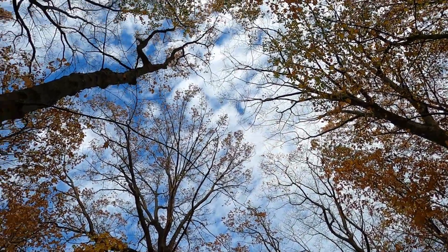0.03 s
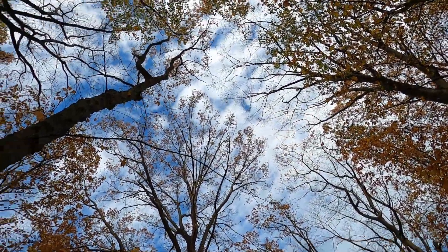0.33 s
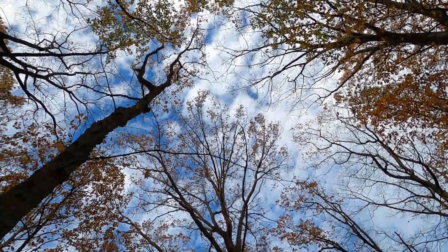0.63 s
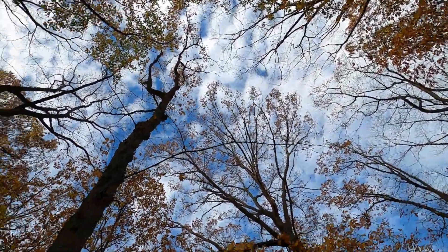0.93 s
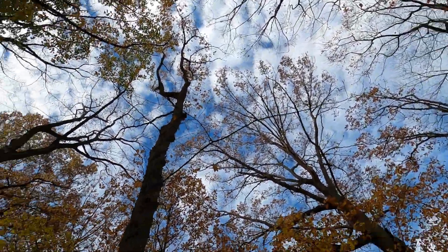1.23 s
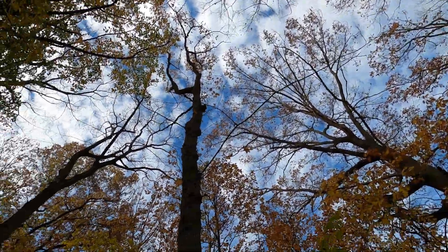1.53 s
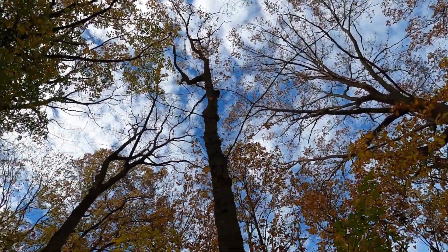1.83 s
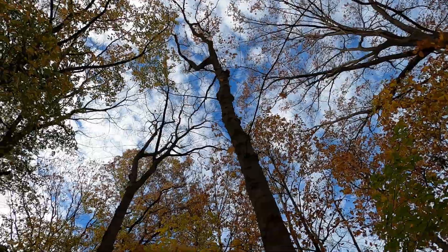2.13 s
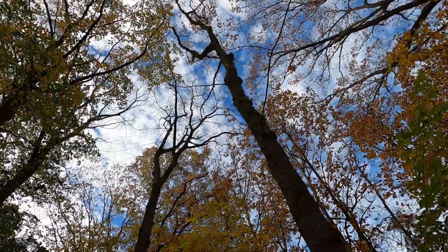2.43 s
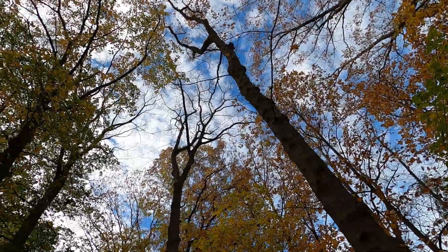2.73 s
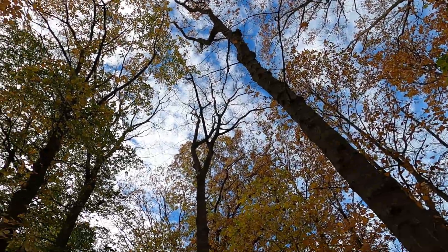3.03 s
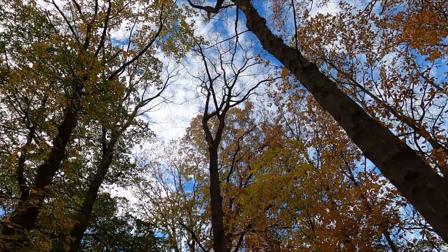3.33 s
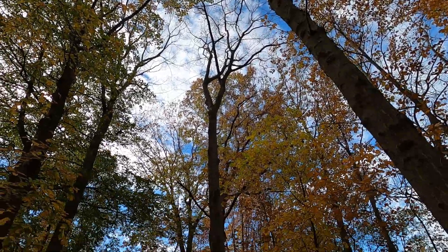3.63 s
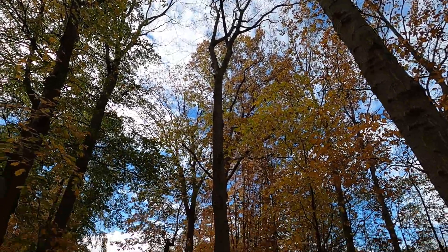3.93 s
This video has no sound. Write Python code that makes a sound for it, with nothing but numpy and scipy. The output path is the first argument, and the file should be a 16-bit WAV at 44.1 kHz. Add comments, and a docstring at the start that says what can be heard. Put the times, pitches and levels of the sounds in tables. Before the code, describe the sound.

Wind blows through high forest foliage as an even, airy rush above a low, distant rumble. It lifts a little in light gusts, then softens, while a few faint dry leaf rustles and ticks come from close by.

```python
"""Wind rushes through the crowns of an autumn wood, swells a little and eases off.
Countless far leaves merge into that rush; gusts add a whoosh, nearer foliage an airy hiss.
A low rumble, like far traffic, lies under it. Close by, dry leaves brush together in faint rustles,
with a few sharper ticks. The bass is nearly mono; the treble differs between the microphone's ports."""
import sys
import numpy as np
from scipy import signal
from scipy.fft import rfft, irfft, next_fast_len
from scipy.io import wavfile
from scipy.ndimage import uniform_filter1d, map_coordinates

SR = 44100
rng = np.random.default_rng(int(sys.argv[2]) if len(sys.argv) > 2 else 0)


def wav_out(sig):
    """Save sig, one row per channel (or a flat mono array), as 16-bit PCM at SR to the path in sys.argv[1]."""
    wavfile.write(sys.argv[1], SR, np.round(np.clip(np.atleast_2d(sig).T, -1, 1) * 32767).astype(np.int16))


N = 176400


def amp(db):
    """Decibels to gain."""
    return 10 ** (np.asarray(db) / 20)


def unit(x):
    """Scale to rms 1."""
    return x / np.sqrt(np.mean(x ** 2) + 1e-20)


def along(points, hz):
    """Read (Hz, value) points on a log frequency axis."""
    freqs, values = np.transpose(points)
    return np.interp(np.log(hz + 1), np.log(freqs + 1), values)


def curve(rows):
    """Join (seconds, value) points into an envelope, one value per sample."""
    return np.interp(np.arange(N) / SR, *np.transpose(rows))


def wobble(rate):
    """A smooth random curve with `rate` knots a second."""
    return map_coordinates(rng.standard_normal(400), [np.arange(N) * rate / SR], mode="wrap")


def filtered(x, response):
    """Equalise x with a gain given as a function of Hz."""
    size = next_fast_len(N + SR // 2)
    return irfft(rfft(x, size) * response(np.fft.rfftfreq(size, 1 / SR)), size)[..., :N]


def patchy_noise(depth_db):
    """Two white noises whose level flickers in patches of time and frequency."""
    spectra = signal.stft(rng.standard_normal((2, N)), nperseg=512)[2]
    patches = uniform_filter1d(rng.standard_normal(spectra.shape[1:]), size=7, axis=0)
    patches = uniform_filter1d(patches, size=30, axis=1, mode="wrap")
    return signal.istft(spectra * amp(depth_db * unit(patches)), nperseg=512)[1][:, :N]


# Stereo width. Each row: frequency in Hz, left-right likeness from 0 (wide) to 1 (mono).
PORT_LIKENESS = [(30, .98), (70, .994), (150, .994), (330, .975), (700, .89), (1050, .84), (1400, .87),
                 (2500, .82), (4000, .71), (5000, .45), (6300, .13), (12000, .05)]
# Stereo balance. Each row: frequency in Hz, left over right in dB.
PORT_BALANCE = [(100, 0.63), (1300, -0.12), (2400, 0.89), (4200, 2.2), (6500, -0.11), (12000, -1)]
LEFT_RIGHT = np.array([[.5], [-.5]])  # half of a difference goes to each side
RIGHT_LEAD_S = 43e-6


def at_ports(pair, colour):
    """Colour two noises as a wide, far source heard by two close microphone ports; rms 1."""
    def mid_side(hz):
        width = np.arccos(np.clip(along(PORT_LIKENESS, hz), -1, 1)) / 2
        return amp(along(colour, hz)) * [np.cos(width), np.sin(width)]

    def placement(hz):
        delay = np.exp(-2j * np.pi * hz * LEFT_RIGHT * RIGHT_LEAD_S)
        return amp(LEFT_RIGHT * along(PORT_BALANCE, hz)) * delay

    mid, side = filtered(pair, mid_side)
    return unit(filtered(np.array([mid + side, mid - side]), placement))


# Fader rides for the broad rush, the gusts' whoosh and the hiss. Each row: time in seconds, level in dB.
RUSH_LEVEL = [(0, -33.5), (.45, -33), (.9, -33), (1.35, -32.5), (1.7, -33), (2.05, -33), (2.45, -34),
              (2.75, -34), (3.1, -35), (3.5, -35), (4, -36.2)]
GUST_LEVEL = [(0, -59), (.4, -53), (.58, -38.5), (.95, -51), (1.15, -35), (1.3, -55), (1.5, -39),
              (1.66, -34.5), (1.95, -41.5), (2.5, -57), (2.7, -39), (2.95, -54), (4, -48)]
FOLIAGE_LEVEL = [(0, -35), (.4, -38), (.8, -40), (1.2, -45.5), (1.75, -40), (2.1, -43.5), (2.7, -44.5),
                 (4, -52)]
# Tone of the same three layers. Each row: frequency in Hz, relative level in dB.
RUSH_COLOUR = [(20, -58), (150, -18), (330, -13.5), (480, -12.5), (780, -9), (930, -4.5), (1040, -4),
               (1180, 1.3), (1450, -0.5), (2050, -3.5), (3000, -10), (4400, -18.5), (6300, -30),
               (9000, -39.5), (12000, -53.5), (15500, -78)]
GUST_COLOUR = [(700, -64), (1050, -10), (1250, -3), (1450, -5), (1750, -10.5), (2600, -26), (6000, -70)]
FOLIAGE_COLOUR = [(300, -90), (700, -20), (1300, 0), (1900, 2), (3000, -11.5), (5000, -16.5), (8000, -30),
                  (11000, -45), (15000, -57)]
# A slight drift to the left as the microphone turns. Each row: time in seconds, left over right in dB.
CROWN_PAN = [(0, 0.5), (.7, 0.2), (1.3, -0.1), (2.2, 0.3), (3, 0.6), (4, 1)]


def wind_in_crowns():
    """Countless far leaves merge into a rush; gusts add a whoosh, nearer foliage a brighter hiss."""
    rush = amp(curve(RUSH_LEVEL)) * at_ports(patchy_noise(depth_db=0.33), RUSH_COLOUR)
    whoosh = amp(curve(GUST_LEVEL)) * at_ports(rng.standard_normal((2, N)), GUST_COLOUR)
    hiss = amp(curve(FOLIAGE_LEVEL)) * at_ports(patchy_noise(depth_db=1.2), FOLIAGE_COLOUR)
    return (rush + whoosh + hiss) * amp(LEFT_RIGHT * curve(CROWN_PAN))


# Fader rides for the rumble's sub, body and upper drone. Each row: time in seconds, level in dB.
SUB_LEVEL = [(0, -45), (.3, -41), (.55, -55), (1.4, -51), (1.95, -46), (2.2, -41), (2.5, -41.5), (2.9, -43),
             (3.2, -45), (3.6, -47)]
BODY_LEVEL = [(0, -37.5), (.65, -41), (.95, -37), (1.3, -37.5), (1.75, -33), (2.4, -36), (3, -37),
              (3.5, -41), (4, -40)]
UPPER_LEVEL = [(0, -47), (.4, -41), (.8, -44), (1.3, -43), (1.8, -52.5), (2.4, -49.5), (3.3, -50), (4, -51)]
# Tone of the same three layers. Each row: frequency in Hz, relative level in dB.
SUB_COLOUR = [(10, -30), (25, -15), (42, 5), (62, 6.5), (85, -20), (140, -10), (600, -120)]
BODY_COLOUR = [(12, -26), (25, -15), (42, -12.5), (62, -2), (84, 0.5), (97, -0.5), (108, 0), (123, -3.5),
               (136, -15.5), (200, -18), (320, -33.5), (800, -69), (3000, -120)]
UPPER_COLOUR = [(30, -70), (70, -44), (110, 4), (150, 4), (200, -5.5), (250, -4), (320, -13.5), (600, -26),
                (2000, -120)]


def far_rumble():
    """Three bands of low, nearly mono noise: the rumble swells and deepens as its upper drone fades."""
    bands = [(SUB_LEVEL, SUB_COLOUR), (BODY_LEVEL, BODY_COLOUR), (UPPER_LEVEL, UPPER_COLOUR)]
    return sum(amp(curve(level)) * at_ports(rng.standard_normal((2, N)), colour)
               for level, colour in bands)


# The crisp tone of a dry leaf, for rustles and ticks. Each row: frequency in Hz, relative level in dB.
LEAF_COLOUR = [(1000, -22), (3000, -5), (5500, 7.5), (8000, -1.5), (11000, -8), (15500, -19)]
# Brief rustles. Each row: peak time in seconds, rise and fall time constant in seconds, level in dB.
RUSTLE_SWELLS = [(.81, .03, -65), (1.15, .3, -70), (1.85, .03, -64), (2.25, .08, -61), (2.735, 0.079, -60),
                 (3.15, 0.048, -56.5), (3.24, 0.07, -66), (3.624, 0.015, -57), (3.7, 0.07, -64)]
CONTACTS_PER_S, CONTACT_SPREAD_DB, STIR_DB = 1800, 1, -76
CLUMPS_PER_S, CLUMP_DB = 24, 1.5


def rustling_leaves():
    """Dry leaves brush in clumps of tiny contacts: a constant faint stir with short swells."""
    t = np.arange(N) / SR
    contacts = rng.random((3, N)) < CONTACTS_PER_S / SR  # left, right and shared by both
    grains = contacts * rng.standard_normal((3, N))
    grains *= amp(-CONTACT_SPREAD_DB * rng.standard_normal((3, N)))
    clumped = (grains[:2] + grains[2]) * amp(CLUMP_DB * wobble(CLUMPS_PER_S))
    crackle = unit(filtered(clumped, lambda hz: amp(along(LEAF_COLOUR, hz))))
    swells = sum(amp(db) * np.exp(-np.abs(t - peak_s) / fade_s) for peak_s, fade_s, db in RUSTLE_SWELLS)
    return crackle * (amp(STIR_DB) + swells)


# Small, sharp accents. Each row: start in seconds, peak level in dB, band centre in Hz.
SNAPS = [(1.605, -50, 5500), (2.735, -43, 7000), (3.058, -47, 9000), (3.14, -47, 11000), (3.172, -45, 7000),
         (3.622, -37, 6200), (3.686, -48, 8000)]
SNAP_WIDTH_OCT, SNAP_T60_S = 0.7, 0.022


def leaf_ticks():
    """Single dry snaps of leaf and twig, each in its own register, die within milliseconds."""
    t = np.arange(N) / SR
    out = np.zeros((2, N))
    for start_s, peak_db, centre_hz in SNAPS:
        noise = rng.standard_normal((3, N))  # left, right and shared by both
        decay = (t >= start_s) * np.exp(-np.log(1000) * np.abs(t - start_s) / SNAP_T60_S)
        burst = (noise[:2] + noise[2]) * decay
        register = lambda hz: np.exp(-.5 * (np.log2((hz + 1) / centre_hz) / SNAP_WIDTH_OCT) ** 2)
        snap = filtered(burst, lambda hz: amp(along(LEAF_COLOUR, hz)) * register(hz))
        out += amp(peak_db) * snap / np.abs(snap).max()
    return out


def scene():
    """The wood, far to near: a bed of rumble, wind overhead, dry leaves close by."""
    return far_rumble() + wind_in_crowns() + rustling_leaves() + leaf_ticks()


BAND_LIMIT_HZ = 15650


def record(dry):
    """The camera keeps nothing above its band limit."""
    return filtered(dry, lambda hz: hz < BAND_LIMIT_HZ)


dry = scene()
out = record(dry)
wav_out(out)
```